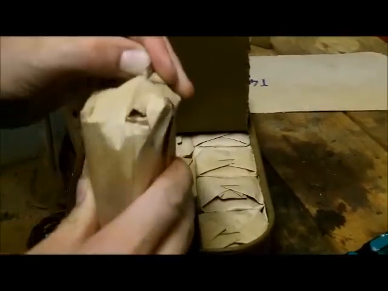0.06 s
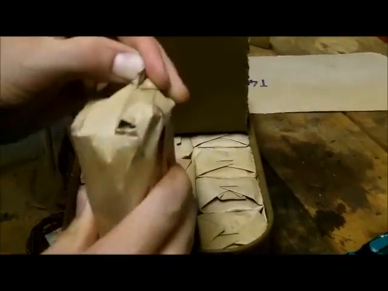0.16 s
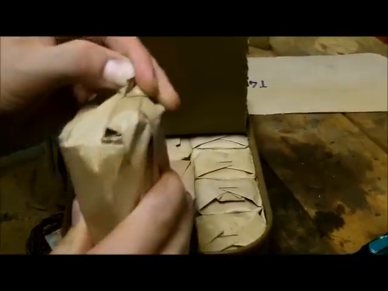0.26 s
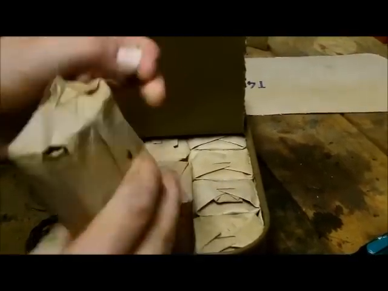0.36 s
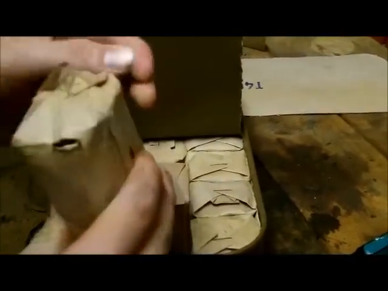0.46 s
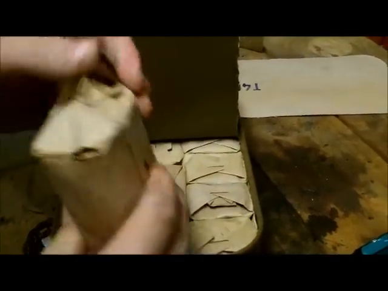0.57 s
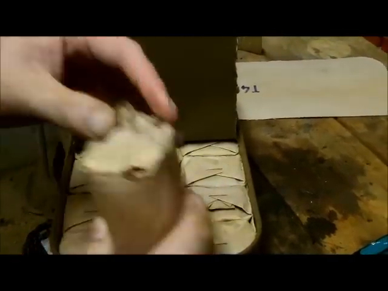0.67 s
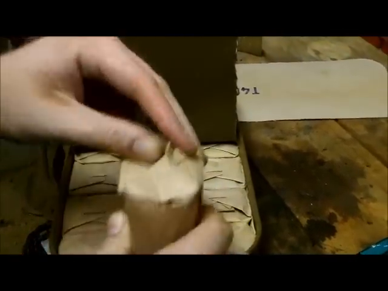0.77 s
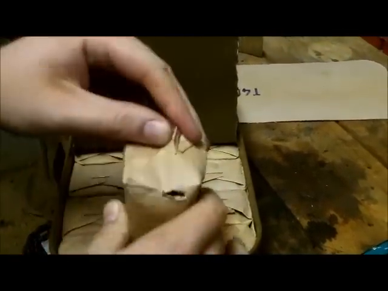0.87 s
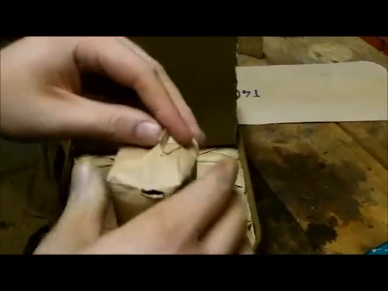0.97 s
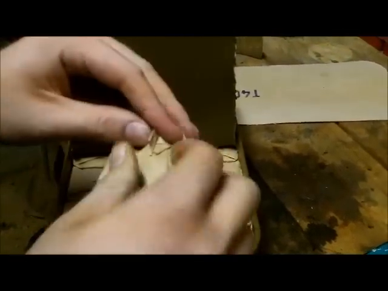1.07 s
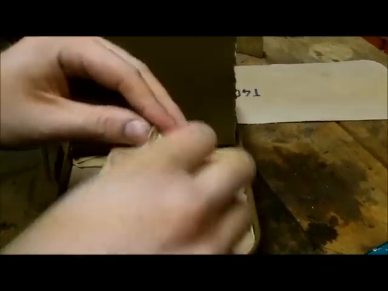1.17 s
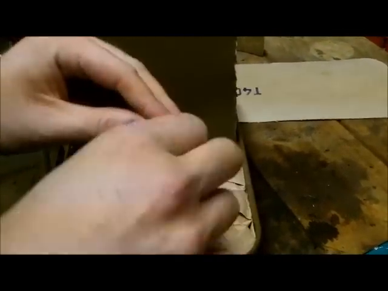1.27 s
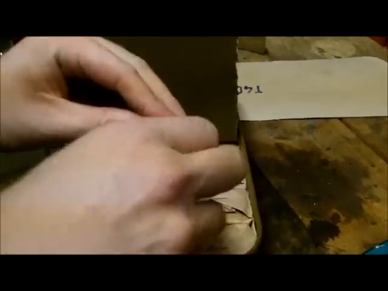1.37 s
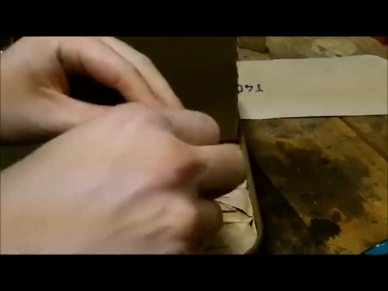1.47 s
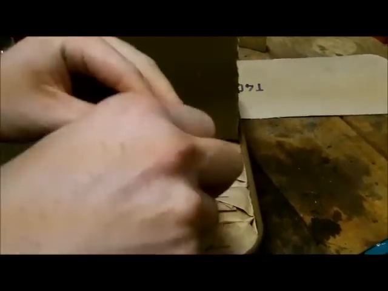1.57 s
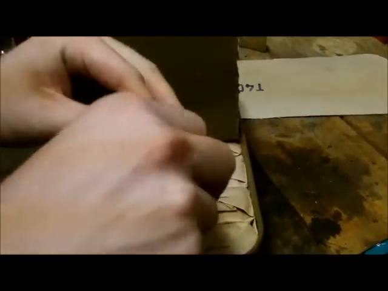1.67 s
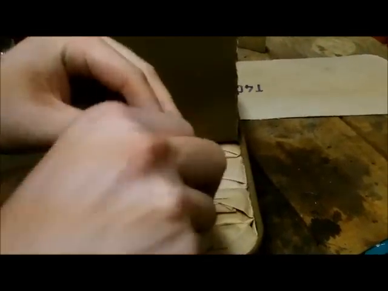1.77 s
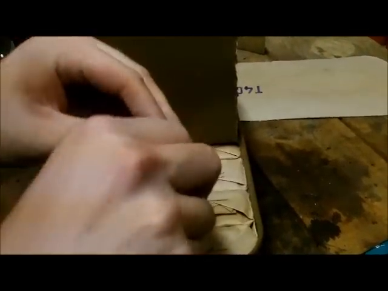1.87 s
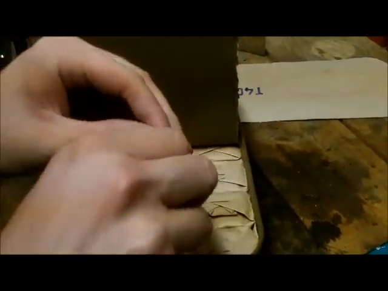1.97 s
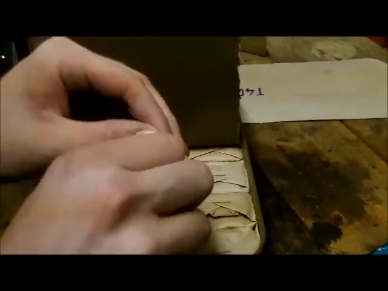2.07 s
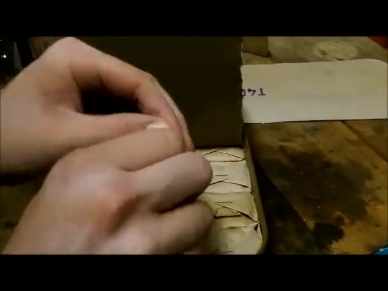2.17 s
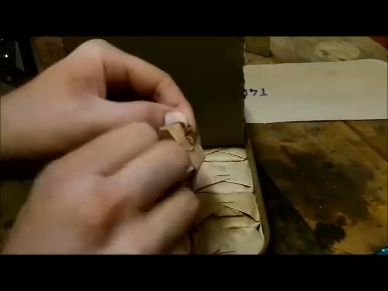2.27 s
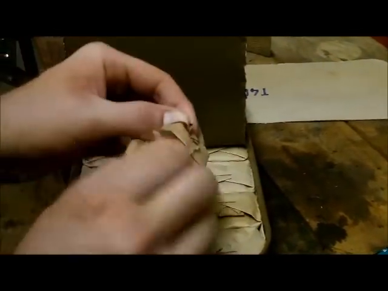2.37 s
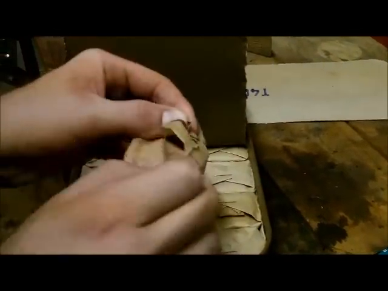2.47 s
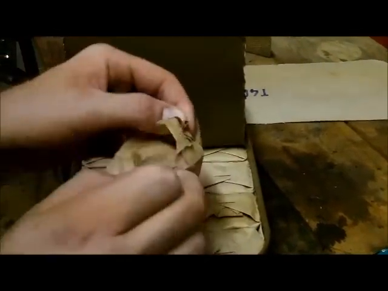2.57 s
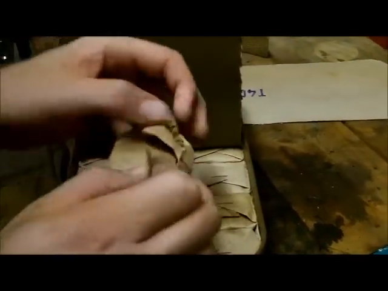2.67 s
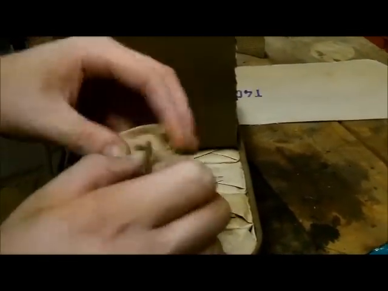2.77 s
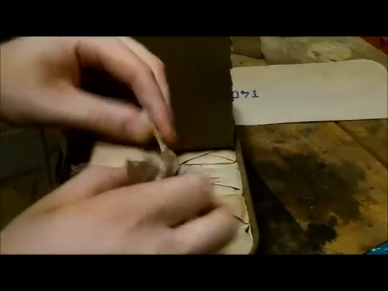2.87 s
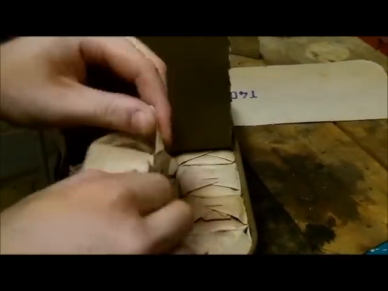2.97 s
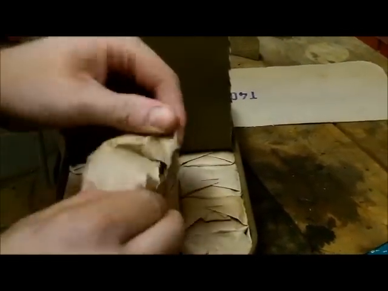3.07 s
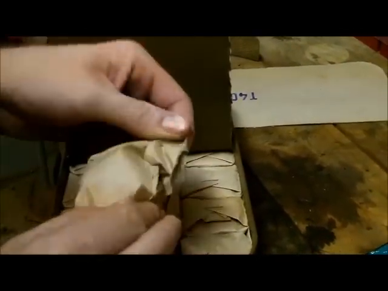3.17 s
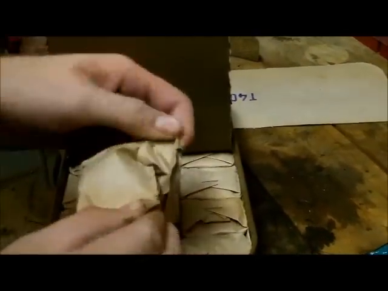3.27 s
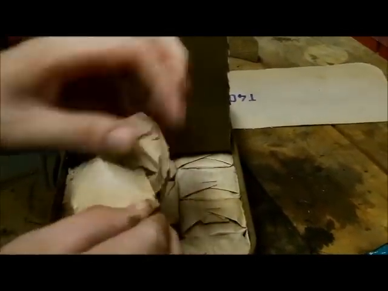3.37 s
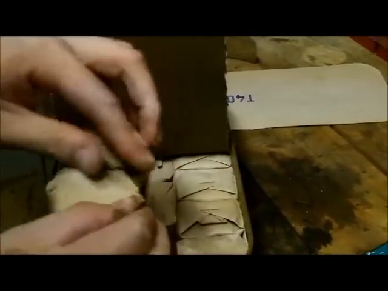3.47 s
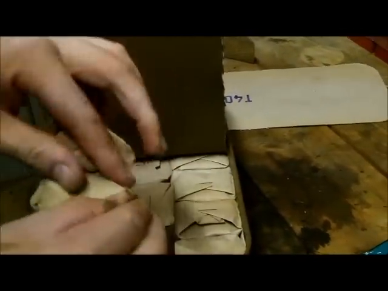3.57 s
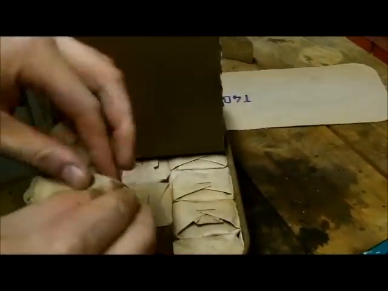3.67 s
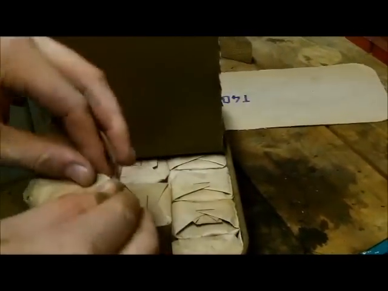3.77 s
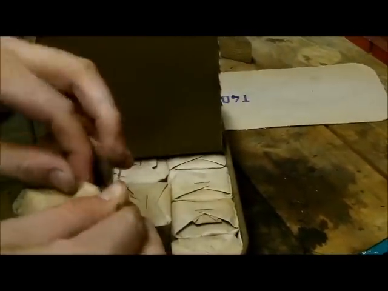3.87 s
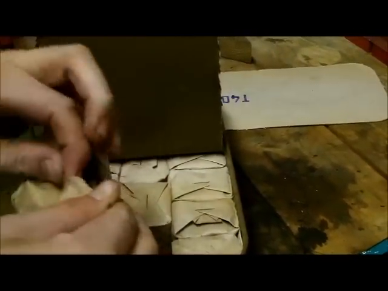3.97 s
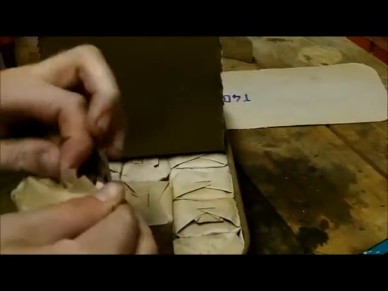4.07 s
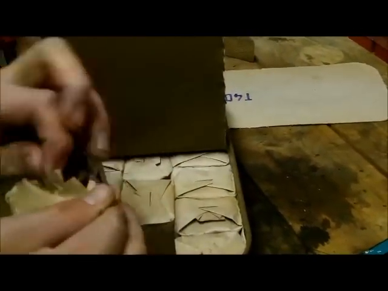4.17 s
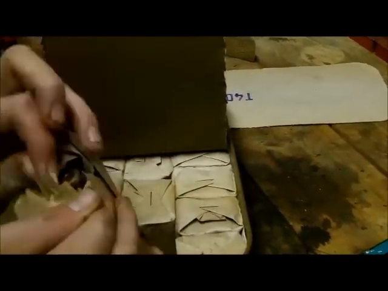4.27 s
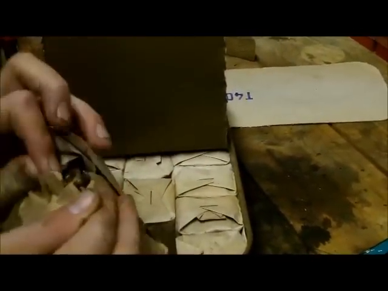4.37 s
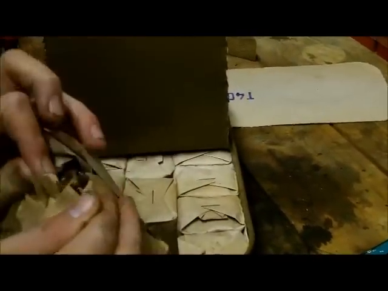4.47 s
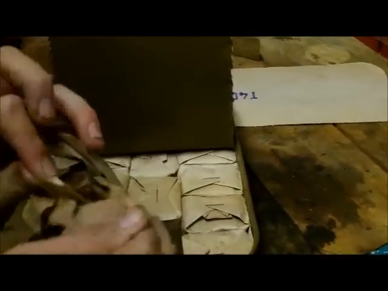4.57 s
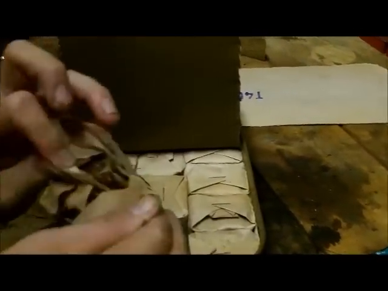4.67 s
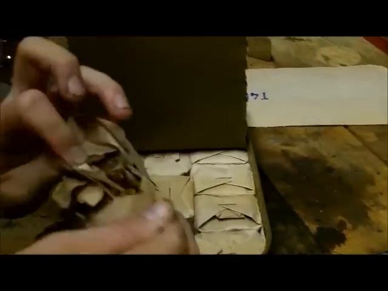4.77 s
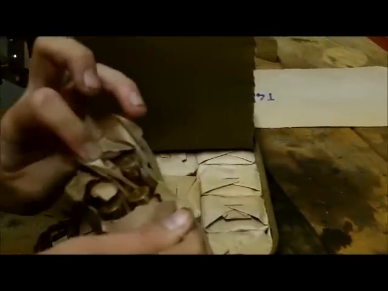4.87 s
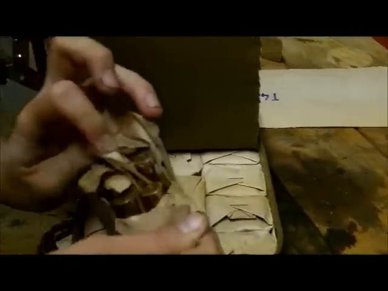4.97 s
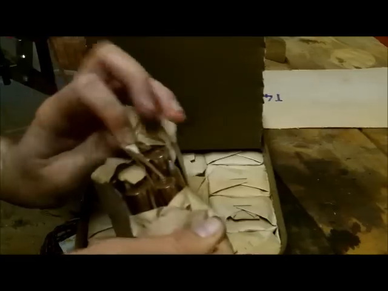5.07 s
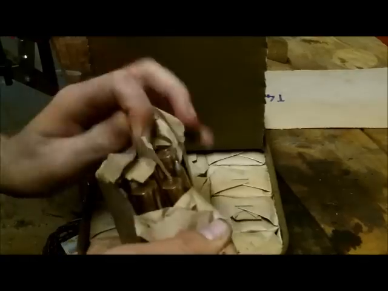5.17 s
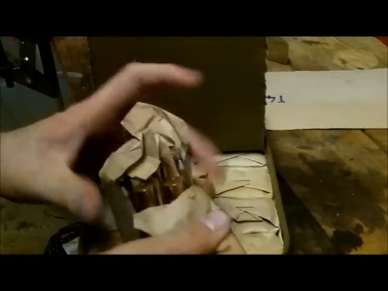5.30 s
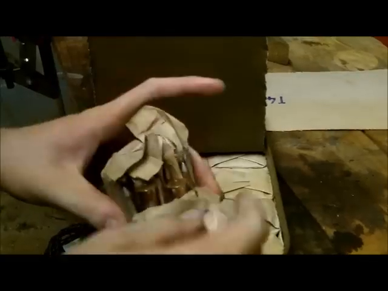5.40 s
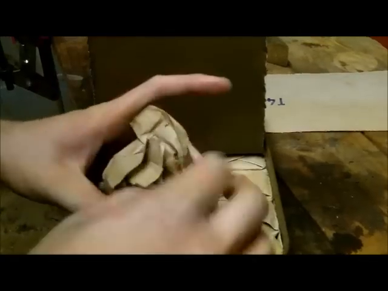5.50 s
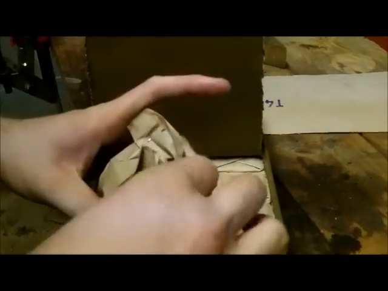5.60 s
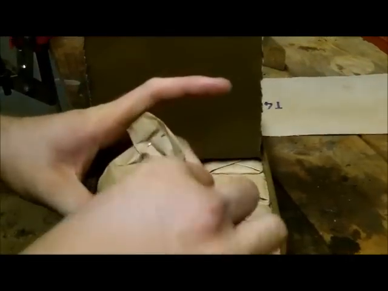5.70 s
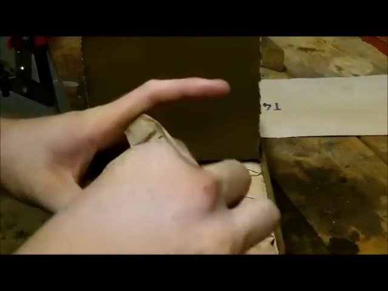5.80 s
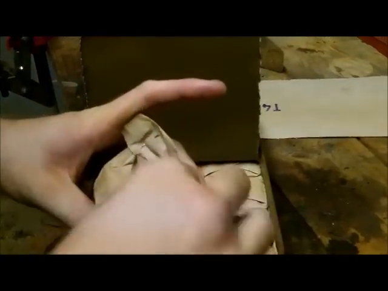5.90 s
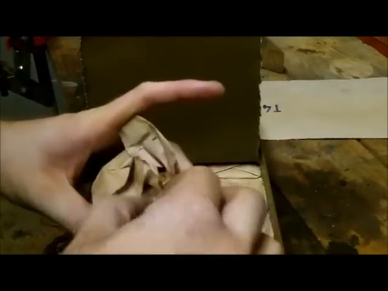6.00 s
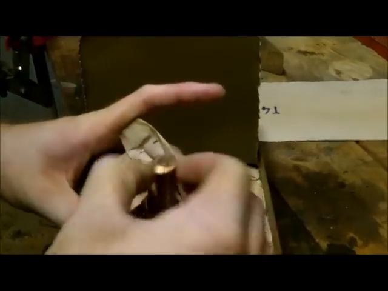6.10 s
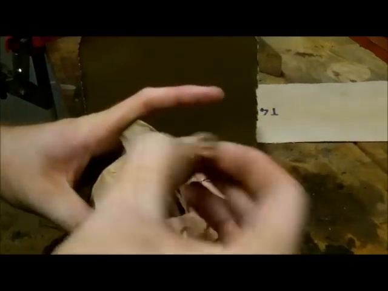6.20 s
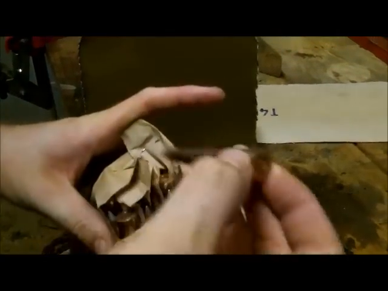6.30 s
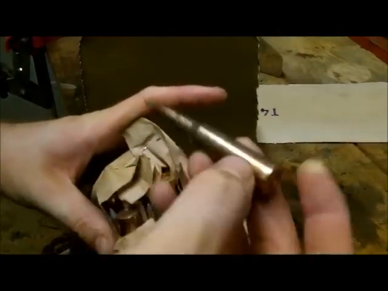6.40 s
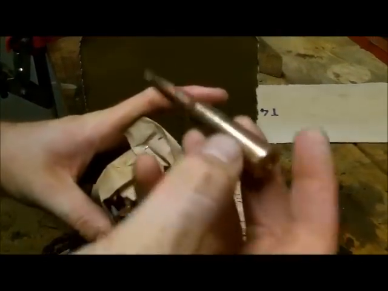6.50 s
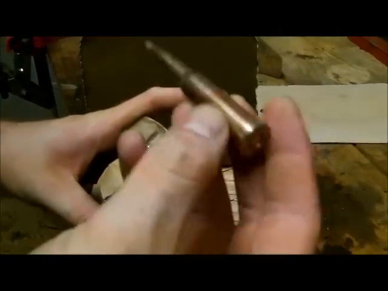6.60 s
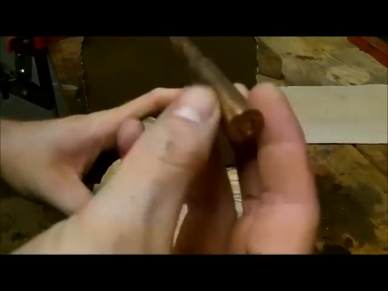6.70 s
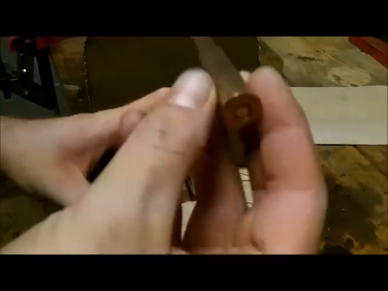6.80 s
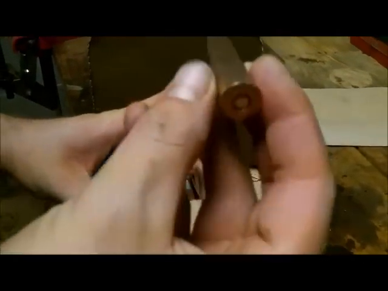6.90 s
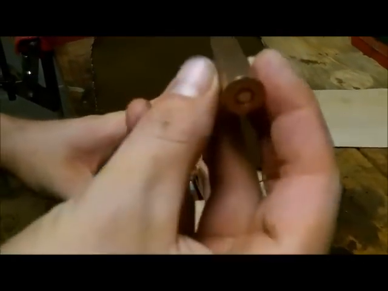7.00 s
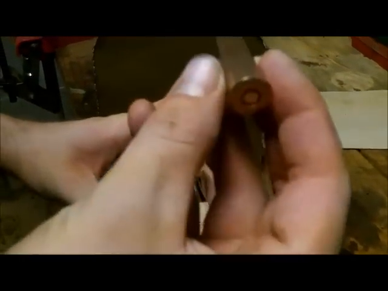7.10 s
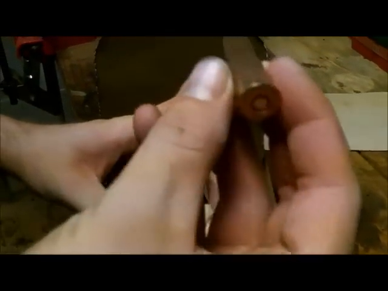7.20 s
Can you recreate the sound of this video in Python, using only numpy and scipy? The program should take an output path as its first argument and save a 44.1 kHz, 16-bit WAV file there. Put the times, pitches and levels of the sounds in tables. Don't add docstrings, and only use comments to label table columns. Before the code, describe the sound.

Stiff wrapping paper is worked by hand very close to the microphone in a quiet workshop with a short, faint echo. From 0 to 1.3 s the packet is turned: hard, bright snaps stand apart over a light rustle. From 1.4 to 2.7 s a nail picks at the flap, with quicker crackles and a brief hissing finger slip near 2.6 s. From 2.75 to 4.1 s the flap tears in dense, sharp cracks and dull pops, some overloading slightly. From 4.1 to 5 s peeling brings thick crinkling and the fullest rustle. It loosens from 5 to 5.6 s, then a small rough double scrape comes at 5.7 s. A short burst of soft rustling and ticks follows around 6 to 6.4 s, then almost nothing but low wavering hum, gentle hiss and a barely audible, rapidly pulsing insect, with one tiny tick near 6.9 s.

```python
import sys
import numpy as np
from scipy import signal
from scipy.fft import rfft, irfft
from scipy.io import wavfile
from scipy.ndimage import uniform_filter1d, map_coordinates

SR = 44100
rng = np.random.default_rng(int(sys.argv[2]) if len(sys.argv) > 2 else 0)


def wav_record(signal):
    frames = np.transpose(np.atleast_2d(signal))
    bounded = np.clip(frames, -1, 1)
    quanta = np.round(bounded * 32767).astype(np.int16)
    wavfile.write(sys.argv[1], SR, quanta)


def boost(x):
    u = np.asarray(x, float) / 20
    return 10 ** u


N = 319725


def unit(x):
    return x / np.sqrt(np.mean(x ** 2) + 1e-20)


def along(points, hz):
    f, v = np.transpose(points)
    return np.interp(np.log(hz + 1), np.log(f + 1), v)


def wobble(rate):
    knots = rng.standard_normal(int(N * rate / SR) + 4)
    return map_coordinates(knots, [np.arange(N) * rate / SR])


def coloured(x, spectrum):
    size = 4096
    cepstrum = irfft(np.log(boost(along(spectrum, np.fft.rfftfreq(size, 1 / SR))) + 1e-6))
    cepstrum[1:size // 2] *= 2
    cepstrum[size // 2 + 1:] = 0
    return signal.fftconvolve(x, irfft(np.exp(rfft(cepstrum))))[:N]


def place(starts, rows):
    at = starts[:, None] + np.arange(rows.shape[1])
    return np.bincount(at.ravel(), rows.ravel(), N + SR)[:N]


def columns(events):
    return np.array(events).T[:, :, None]


def pops(s, db, hz, t60, damping, broad, pure=0.2, size=1536):
    t = np.arange(size) / SR
    decay = boost(-60 * (t / np.clip(t60, .002, .06)) ** 1.4)
    fade = decay * (1 - np.exp(-t / 0.0004))
    f = np.fft.rfftfreq(size, 1 / SR)
    flap = 1j * f * damping * hz / (hz * hz - f * f + 1j * f * damping * hz)
    burst = rng.standard_normal((len(s), size)) * fade
    burst[:, 12] = 7
    ring = pure * np.sin(2 * np.pi * hz * t) * fade + irfft(rfft(burst) * (flap + broad))
    ring = boost(db) * ring / np.abs(ring).max(axis=1, keepdims=True)
    return place(np.round(s[:, 0] * SR).astype(int), ring)


# start_s [s], level_db [dB peak], pitch_hz [Hz]
TURN_SNAPS = [(0.027, 1, 4700), (0.0748, -2.5, 2400), (0.0815, 3, 3940), (0.0858, -4, 1980),
              (0.201, -13, 4100), (0.2256, 2, 1985), (0.254, -16, 4330), (0.3566, 7, 3960),
              (0.4236, -3, 4500), (0.522, -12.5, 4500), (0.53, -9, 4670), (0.58, -3, 3600),
              (0.631, -20, 2300), (0.7537, -14, 3800), (0.8007, -13, 4570), (0.8714, -11, 3580),
              (0.983, -8, 3600), (1.0211, -13, 1440), (1.039, 4, 3700), (1.156, -14, 3730),
              (1.176, -7.5, 3770), (1.203, -5.5, 3830), (1.212, -8, 3770)]
PICK_SNAPS = [(1.4367, -10.5, 3740), (1.4819, 5.5, 4000), (1.5922, -0.5, 1330), (1.715, -11.5, 1730),
              (1.7307, 2.5, 3610), (1.7902, -7, 4020), (1.8644, -1, 2380), (2.0196, 0.5, 1770),
              (2.0379, 6.5, 5400), (2.052, -2, 4040), (2.074, -22, 1420), (2.1271, -9, 3930),
              (2.143, 3.5, 5300), (2.1795, -10, 1710), (2.2472, -11.5, 1530), (2.2797, 3.5, 4700),
              (2.292, 6, 4900), (2.3097, -4, 4020), (2.3229, -3, 4540), (2.3816, -14, 2580),
              (2.408, -21, 4370), (2.4136, -11, 1710), (2.4447, -15.5, 2950), (2.5402, 2.5, 3360),
              (2.567, -8, 4200), (2.595, -4.5, 3000), (2.643, 2.5, 4030), (2.659, -9, 4280)]
TEAR_SNAPS = [(2.7586, -4.5, 4250), (2.8055, -8.5, 1480), (2.8523, -4.5, 4290), (2.896, -4.5, 3900),
              (2.9349, 1, 1830), (2.9736, -5, 4800), (2.9963, -2.5, 4130), (3.0109, -5.5, 1740),
              (3.072, -6, 3930), (3.1158, -3, 4320), (3.1203, 6, 4030), (3.148, -3, 3750),
              (3.1929, 1, 2680), (3.237, 2.5, 4100), (3.329, 8, 5050), (3.3728, -6, 2520),
              (3.399, -7, 3860), (3.4165, -1.5, 3450), (3.4596, -0.5, 2630), (3.518, -5.5, 5000),
              (3.637, -9.5, 2550), (3.651, -2, 4550), (3.7277, 2, 2350), (3.7556, -13, 2740),
              (3.796, 0.5, 3080), (3.8577, -7.5, 2550), (3.98, -2, 2980), (4.0107, 7.5, 4600),
              (4.0617, -9, 4700), (4.0753, -5, 2440)]
PEEL_SNAPS = [(4.09, -9, 2400), (4.111, -8, 4000), (4.1245, -10, 3650), (4.135, 0, 3930),
              (4.156, -5.5, 2900), (4.2182, 2, 4140), (4.281, -3, 4240), (4.346, -12, 4730),
              (4.4598, -7, 4900), (4.475, -7, 3300), (4.5274, -10, 3100), (4.546, -10, 3000),
              (4.6215, 3.5, 3920), (4.636, 3.5, 3750), (4.6437, -5.5, 2890), (4.661, 0, 2460),
              (4.818, -8, 4040), (4.8342, 1, 4960), (4.8676, 3, 4820), (4.8948, -1, 3190)]
RELAX_SNAPS = [(5.0688, -4, 3150), (5.212, -10.5, 1810), (5.2813, -2, 3730), (5.3472, -1.5, 4000),
               (5.3742, -10, 4400), (5.41, -1.5, 3030), (5.4675, -10, 4100), (5.487, 4, 4400),
               (5.5646, -9, 4700), (5.5939, -1, 3350), (5.6192, -3, 3900), (5.808, -22.5, 3800),
               (5.962, -25, 3530), (6.015, -21, 2400), (6.043, -28, 2080), (6.1313, -9.5, 4650),
               (6.1473, -12, 4100), (6.324, -16.5, 2600), (6.4403, -25.5, 4670), (6.544, -28.5, 4240),
               (6.9127, -29, 4200)]
SNAPS = TURN_SNAPS + PICK_SNAPS + TEAR_SNAPS + PEEL_SNAPS + RELAX_SNAPS


def main_creases():
    s, db, hz = columns(SNAPS)
    scatter = np.exp(0.12 * rng.standard_normal((len(s), 1)))
    t60 = 0.0065 * scatter * boost(-0.16 * np.clip(db - 8.5, -6, 15))
    cracks = pops(s, db + 3.0, hz, 1.15 * t60, damping=1.0, broad=hz / 7000, pure=1.2, size=512)
    rattle = pops(s, db - 20, hz, 0.022, damping=1.0, broad=2.0, pure=0, size=1024)
    return cracks + rattle


def fibres():
    s, db, _ = columns(SNAPS)
    spit_db = db - 23.5 + 3.5 * rng.standard_normal((len(s), 1))
    spit = pops(s, spit_db, 8800, 0.006, damping=0.65, broad=0.15, size=320)
    return coloured(spit, [(6000, -58), (8600, 10.5), (11000, 3), (13000, -24.0)])


# start_s [s], level_db [dB peak], pitch_hz [Hz]
SECOND_FACES = [(0.0813, -7.5, 2070), (0.2267, -4.5, 4000), (1.042, -19, 2070), (1.7314, -2.5, 5160),
                (1.864, -9.5, 4030), (2.0216, -3, 4260), (2.037, -14, 1360), (2.055, -18, 3000),
                (2.2796, -13.5, 2750), (2.292, -4, 6700), (2.415, -18, 3030), (2.5397, -11.5, 1880),
                (2.6456, -28, 1620), (2.8049, -4.5, 4260), (2.9354, -7.5, 4080), (2.9735, -12.5, 2840),
                (3.0102, -3, 4300), (3.1933, -10, 3700), (3.237, -12.5, 1600), (3.3295, -8.5, 2950),
                (3.415, -13, 5900), (3.461, -8, 5570), (3.638, -8.5, 4050), (3.652, -16, 4050),
                (3.7942, -8, 4100), (3.859, -15, 4240), (3.9792, -4.5, 5270), (3.989, -18, 3720),
                (4.0095, -10, 4370), (4.2185, -10, 6040), (4.526, -12, 5830), (4.6256, -8, 3580),
                (4.6416, -8, 4100), (4.833, -17, 5900), (4.8677, -10, 2970), (5.0663, -17, 3220),
                (5.485, -10, 3220), (5.5948, -10.5, 1850), (5.619, -18, 2200)]


def second_faces():
    return pops(*columns(SECOND_FACES), 0.0052, damping=0.9, broad=0.14, pure=3.25, size=512)


# start_s [s], level_db [dB peak], pitch_hz [Hz]
TICKS = [(0.1892, -12, 3430), (0.3328, -19, 2350), (0.371, -18, 2500), (0.396, -26, 4050),
         (0.401, -16, 4130), (0.4053, -21, 2560), (0.428, -21, 4370), (0.436, -3, 2140),
         (0.4686, -13, 2600), (0.5647, -9, 4300), (0.643, -9, 2480), (0.7143, -8, 4300),
         (0.7492, -5, 2070), (0.836, -13, 2430), (0.8552, -14, 2400), (0.8864, -8, 3400),
         (0.913, 2, 2170), (1.012, -3, 2650), (1.127, -10, 3540), (1.1928, -5, 3490),
         (1.4465, -20, 4080), (1.4681, -13, 3750), (1.5116, -5, 1860), (1.567, -10, 5060),
         (1.5878, -1, 4300), (1.629, -6, 1360), (1.805, -4, 4860), (1.833, -16, 1410),
         (1.849, -1, 2520), (1.9689, -18, 3780), (2.0502, -6, 3970), (2.1142, -13, 3950),
         (2.175, -10, 3830), (2.2701, -22, 4610), (2.318, -4, 5050), (2.36, -19, 2930),
         (2.375, -14, 3520), (2.3888, -21, 3940), (2.504, -19, 4130), (2.509, -10, 2820),
         (2.545, -2, 4780), (2.5817, -29, 1030), (2.6354, -22, 4000), (2.6995, -23, 3120),
         (2.8198, -6, 1540), (2.958, -4, 2000), (2.987, -4, 1700), (3.035, -4, 4370),
         (3.053, -0.5, 1620), (3.1245, -3, 4870), (3.132, 0, 2500), (3.214, -7, 5580),
         (3.3884, -17, 2410), (3.405, -3, 3760), (3.522, -11, 3800),
         (3.539, -19, 4240), (3.56, -30, 3450), (3.5712, -16, 3880), (3.697, -6, 4100),
              (3.7755, -8, 1700), (3.8272, -1, 2400), (3.876, 0, 2850), (3.922, -7, 4180),
              (3.9552, -13, 4200), (4.0256, -24, 2950), (4.085, -12, 4070), (4.1086, -5, 3830),
              (4.1287, -5, 3960), (4.1426, -17, 5710), (4.1485, -1, 2840), (4.1915, -15, 3530),
              (4.245, -4, 4180), (4.2934, -20, 3700), (4.3219, -14, 4970), (4.365, -7, 4870),
              (4.3735, -8, 2920), (4.383, -3, 3550), (4.3782, -3, 3680), (4.389, -15, 3730),
              (4.4355, -1, 3650), (4.444, -10, 3630), (4.4642, -17, 2770), (4.4817, -18, 4610),
              (4.4905, -17, 3960), (4.505, -5, 5790), (4.5597, -5, 5460), (4.566, -17, 2950),
              (4.6057, -23, 3290), (4.6166, -25.0, 3570), (4.6725, -2, 2480), (4.7622, -7, 3760),
              (4.8246, -11, 2160), (4.881, -4, 4600), (4.887, -12, 4570), (4.916, 3, 2600),
              (4.9897, -3, 3870), (4.9995, -13, 3860), (5.0114, -10, 2050), (5.0362, -21, 3510),
              (5.05, -2.5, 1880), (5.0624, -13, 2100), (5.1006, -13, 2090), (5.134, 0, 4670),
              (5.264, -12, 4230), (5.2927, -27, 3210), (5.2985, -21.0, 3230), (5.3176, -29, 4330),
              (5.3352, -29, 3570), (5.562, -10, 4890), (6.0438, -5, 4860), (6.361, -18, 2650)]


def small_creases():
    return pops(*columns(TICKS), 0.006, damping=0.9, broad=0.7, pure=.7, size=384)


def crinkles(high):
    draw = rng.random((380, 3))
    share = np.cumsum(np.sqrt(high))
    at = np.searchsorted(share / share[-1], draw[:, 0])
    db = 20 * np.log10(high[at]) + 11 + 8 * (draw[:, 1] - .5)
    hz = 3700 * 2 ** (1.4 * (draw[:, 2] - .5))
    return pops(*columns(list(zip(at / SR, db, hz))), 0.005, damping=1.0, broad=1.0, size=256)


# start_s [s], level_db [dB peak], pitch_hz [Hz]
KNOCKS = [(0.2258, -13.5, 710), (0.4286, -23, 810), (0.913, -32, 584), (0.9817, -33, 1030),
          (1.646, -25, 1270), (1.834, -24.5, 780), (2.0344, -14, 1410), (2.1818, -16.5, 970),
          (2.289, -26, 920), (2.581, -26, 1060), (2.6442, -26, 780), (2.8032, -10.5, 520),
          (2.9305, -24, 1080), (2.9728, -19, 1020), (3.3706, -26, 860), (3.6366, -28.5, 1170),
          (3.989, -19, 820), (5.2142, -27.5, 846), (5.4107, -25, 866), (5.5954, -20, 634),
          (6.133, -31.5, 670)]
# pitch_hz [Hz], level_db [dB]
BODY = [(100, -22), (300, 5.5), (600, 2), (1200, 5), (2000, 11), (4000, -13)]


def panel_knocks():
    s, db, hz = columns(KNOCKS)
    t60 = 0.018 * boost(-0.86 * (db + 26))
    return boost(4.5) * coloured(pops(s, db, hz, t60, damping=1.0, broad=0.15, pure=0.71), BODY)


# pitch_hz [Hz], level_db [dB]
EDGE = [(100, -13), (500, -11), (1500, 1), (5000, 0.5), (6300, -3.5), (7900, -15), (8800, -17),
        (10500, -43), (12500, -57), (16000, -56)]


def snaps(high):
    cracks = main_creases() + second_faces() + small_creases() + crinkles(high)
    return coloured(cracks, EDGE) + fibres() + panel_knocks()


# start_s [s], puff_db [dB peak], edge_db [dB peak]
JOLTS = [(0.2265, -48, -14), (0.3577, -24.5, -11), (0.912, -26, -60), (1.0387, -27, -48), (1.484, -35, -29),
         (1.7305, -28, -19), (2.019, -38, -50), (2.2907, -49, -22), (2.542, -46, -23), (2.936, -52, -30),
         (3.329, -28, -14), (4.0093, -28, -20), (5.487, -58, -38)]


def jolts():
    s, puff_db, edge_db = columns(JOLTS)
    t = np.arange(256) / SR
    puff_s = 0.00053
    puff = -boost(puff_db) * t / puff_s * np.exp(1 - t / puff_s)
    puffs = place(np.round(s[:, 0] * SR).astype(int), puff)
    edges = pops(s, edge_db, 13400, 0.0037, damping=0.64, broad=.3, pure=0, size=256)
    return puffs + coloured(edges, [(9000, -41), (11500, 10), (16000, 1)])


# start_s [s], level_db [dB of rustle]
HANDS = [(0, -43.5), (.6, -44.5), (1.6, -41), (1.95, -47.5), (2.3, -39), (3, -38), (3.3, -44.5),
         (3.45, -41.5), (4.35, -38), (4.6, -36), (5.4, -33.5), (5.68, -46), (5.77, -48.5), (5.83, -57.5),
         (6.3, -42), (6.45, -67.5), (7.05, -67.5), (7.25, -48)]
# start_s [s], low_share_db [dB]
GRIP = [(0, -7), (.45, -2), (.75, -10), (.95, 0.5), (1.35, -3), (1.8, -1), (2.4, -6.5), (2.65, -10.5),
        (2.9, -1), (3.15, -9.5), (3.55, -0.5), (4.1, -10.5), (4.35, -7.5), (4.7, -10), (5.1, -16.5),
        (5.5, -5.5), (6.06, -2.5), (6.2, -11.5)]
# start_s [s, centre], level_db [dB rms], half_length_s [s]
SQUEEZES = [(0.041, -41, 0.021), (0.221, -43, .048), (0.387, -43, .02), (0.429, -20, .0077),
            (0.715, -28.5, .04), (0.804, -26, .0046), (0.88, -27, .006), (0.901, -26.5, .025),
            (1.026, -26.5, .0097), (1.187, -39.5, .04), (1.332, -35, 0.035), (1.456, -37.5, 0.021),
            (1.624, -33, .026), (1.709, -37, .023), (1.808, -37.5, .037), (2.045, -31, 0.02),
            (2.326, -26, .042), (2.62, -32.5, .066), (2.657, -32, .015), (2.782, -34, 0.027),
            (2.918, -24.5, 0.011), (2.993, -38, .05), (3.128, -20.5, .0066), (3.153, -25.5, .047),
            (3.231, -29, 0.0068), (3.42, -36.5, .03), (3.53, -32, .018),
            (3.646, -35, .021), (3.786, -26.5, .019), (3.826, -30.5, .0082), (3.914, -35.5, .015),
         (3.98, -26, 0.023), (4.125, -24.5, .033), (4.28, -34, .018), (4.396, -27, .062),
         (4.45, -32, .0081), (4.641, -21, .0069), (4.665, -14, .006), (4.691, -28, 0.016),
         (4.802, -27, .024), (4.899, -18.5, .0068), (4.939, -23, .026), (5.056, -26.5, .015),
         (5.118, -20, .02), (5.255, -32, .039), (5.473, -31.5, 0.025), (5.563, -34.5, .063),
         (5.586, -29, .0088), (6.047, -37.5, .0081), (6.079, -32.5, .022), (6.171, -30, .029),
         (6.258, -38, 0.014), (6.291, -33, 0.0082), (6.327, -41, 0.0046)]


def handling():
    t = np.arange(N) / SR
    steady = boost(np.interp(t, *np.transpose(HANDS)))
    grip = boost(np.clip(np.interp(t, *np.transpose(GRIP)), -24, 3))
    high = steady.copy()
    for s, db, half in SQUEEZES:
        near = slice(max(0, round((s - .3) * SR)), round((s + .3) * SR))
        distance = np.abs((t[near] - s) / np.clip(half, .003, .1))
        high[near] += boost(db) * np.exp(-.5 * distance ** 2.1)
    low = grip * (high - 0.068 * steady)
    dull = boost(-13.5) * grip * steady
    return high, low, dull


def buckles(rate, spread_db, hz, octaves, cycles, clump_db, size=192):
    draw = rng.random((int(rate * N / SR), 4))
    t = np.arange(size) / SR
    pitch = np.clip(hz * 2 ** (octaves * (draw[:, 1:2] + draw[:, 2:3] - 1)), 100, SR / 3)
    strength = boost(-spread_db * np.log(1 - draw[:, 3:] * .995))
    waves = strength * np.sin(2 * np.pi * pitch * t) * np.exp(-t * pitch / cycles)
    x = place((draw[:, 0] * N).astype(int), waves)
    return unit(x * boost(np.clip(clump_db, 0, 4) * wobble(150)))


def whitened(x):
    hz, power = signal.welch(x, SR, nperseg=256)
    inverse_db = -10 * np.log10(power[1:] / power.max() + 1e-5)
    return coloured(x, list(zip(hz[1:], inverse_db)))


def patchy(x, depth_db):
    z = signal.stft(x, nperseg=256)[2]
    field = uniform_filter1d(rng.standard_normal(z.shape), size=5, axis=0)
    field = uniform_filter1d(field, size=7, axis=1)
    return signal.istft(z * boost(depth_db * unit(field)), nperseg=256)[1][:N]


# pitch_hz [Hz], level_db [dB per Hz]
PAPER = [(120, -54), (200, -18), (432, -19.5), (1000, -11), (1940, -0.5), (4680, 1.5), (6280, -6),
         (7970, -21), (8740, -14.5), (10300, -15), (12200, -40), (14900, -36), (16000, -47)]


def rustle(high, low, dull):
    folds = whitened(buckles(5500, spread_db=4.3, hz=3800, octaves=1.6, cycles=2, clump_db=2.6, size=112))
    sheet = coloured(patchy(unit(folds) + .45 * rng.standard_normal(N), 2.3), PAPER)
    deep = signal.sosfiltfilt(signal.butter(3, 2300, fs=SR, output="sos"), sheet)
    bright = sheet - deep
    scrape = coloured(buckles(1500, spread_db=3.5, hz=846, octaves=1.19, cycles=7.8, clump_db=6), BODY)
    body = (dull + 0.3 * low) * unit(scrape)
    return boost(-1.08) * high * unit(bright) + boost(-2.5) * low * unit(deep) + body


# start_s [s, centre], level_db [dB rms], half_length_s [s]
SLIPS = [
    (2.317, -55, .04),
    (2.634, -26.5, 0.021),
    (3.15, -37, 0.029),
    (3.78, -50, 0.048),
    (5.086, -38.5, 0.053),
]


def finger_slips():
    t = np.arange(N) / SR
    slip = sum(boost(db) * np.exp(-.5 * ((t - at) / half) ** 2) for at, db, half in SLIPS)
    rough = rng.standard_normal(N) * boost(10.3 * wobble(200))
    return slip * unit(coloured(rough, [(7800, -25), (8800, 4), (10800, -7), (12000, -47)]))


def slide():
    t = np.arange(N) / SR
    rough = unit(wobble(520) * boost(1.5 * wobble(45)))
    hz = np.interp(t, [5.67, 5.72], [1000, 760])
    tone = np.sin(2 * np.pi * np.cumsum(hz) / SR)
    stroke = np.exp(-((t - 5.7) / 0.086) ** 4)
    reversal = np.abs(np.tanh((t - 5.705) / 0.022))
    return boost(-40.5) * rough * stroke * reversal * tone


# pitch_hz [Hz], t60_s [s]
WALLS = [(200, .15), (2000, .1), (8000, .06)]


def room(x):
    hz, t, z = signal.stft(rng.standard_normal(SR // 3), SR, nperseg=256)
    decay = boost(-60 * t / along(WALLS, hz)[:, None])
    tail = signal.istft(z * decay, SR, nperseg=256)[1]
    return signal.fftconvolve(np.pad(x, (200, 0)), tail / np.linalg.norm(tail))[:N]


# pitch_hz [Hz], level_db [dB]
AIR = [(22, 0.5), (36, -12), (55, -6.5), (90, -11.5), (150, -16.5), (300, -19), (1200, -26.5),
       (3000, -24.5), (5000, -28.5), (7800, -40.5), (9000, -36), (14800, -37), (15500, -43)]


def room_air():
    return boost(-47 + 0.83 * wobble(2.46)) * unit(coloured(rng.standard_normal(N), AIR))


# pitch_hz [Hz], level_db [dB rms]
HUM = [(55.5, -60), (118.4, -55.5), (236.9, -65), (1470, -59), (3591, -62), (3763, -71)]


def mains_hum():
    t = np.arange(N) / SR
    beat = np.sin(np.pi * (t - .17) / .4335)
    hum = 0
    for hz, db in HUM:
        depth_db = 2 if hz < 300 else 0.6
        level = boost(db + 3.5 + depth_db * wobble(7.9))
        line = level * np.sin(2 * np.pi * hz * t + 0.2 * wobble(2.28))
        hum = hum + line * (beat if 100 < hz < 150 else 1)
    return hum


def insect():
    t = np.arange(N) / SR
    band = coloured(rng.standard_normal(N), [(2400, -83), (2650, 4), (3050, -7), (3300, -47)])
    return boost(-58.5 + 3 * wobble(2)) * np.sin(np.pi * 9.3 * t) ** 4 * unit(band)


def scene():
    high, low, dull = handling()
    paper = snaps(high) + jolts() + rustle(high, low, dull) + finger_slips() + slide()
    return (paper + boost(-20) * room(paper) + room_air() + mains_hum() + insect())[None]


def treble_gaps(x):
    treble = signal.sosfiltfilt(signal.butter(6, 7200, "high", fs=SR, output="sos"), x)
    now = np.abs(uniform_filter1d(x ** 2, size=64)) + 1e-9
    past = np.pad(np.abs(uniform_filter1d(x ** 2, size=300)), (290, 0))[:N]
    return x - treble * uniform_filter1d(1. * (past > boost(30) * now), size=48)


def band_gaps(x, under_db):
    hz, _, z = signal.stft(x, SR, nperseg=512)
    power = np.abs(z) ** 2
    band = (hz // 700).astype(int)
    level = np.array([power[band == b].sum(0) for b in range(band.max() + 1)])
    chance = boost(16 * unit(uniform_filter1d(rng.standard_normal(level.shape), size=3)))
    total = power.sum(0)
    loud = total + 1.9 * np.roll(total, 2) + 1.1 * np.roll(total, 4)
    weak = level < boost(2 * under_db) * loud * chance
    faint = level < boost(2 * -68)
    gone = weak[band] & (hz > 7000)[:, None]
    gone |= faint[band] & (hz > 15400)[:, None]
    gone |= (hz > 16450)[:, None]
    return signal.istft(z * ~gone, SR, nperseg=512)[1][:N]


def roll_off(x):
    return signal.sosfilt(signal.butter(12, 16450, fs=SR, output="sos"), x)


def record(dry):
    ported = signal.lfilter(*signal.iirnotch(7950, 5.5, SR), dry[0])
    flattened = ported / (1 + np.abs(ported / .92) ** 10) ** (1 / 10)
    push = 0.16 * uniform_filter1d(flattened ** 4, size=24)
    thinned = band_gaps(treble_gaps(flattened - push), under_db=-53)
    return roll_off(thinned[None])


dry = scene()
out = record(dry)
wav_record(out)
```